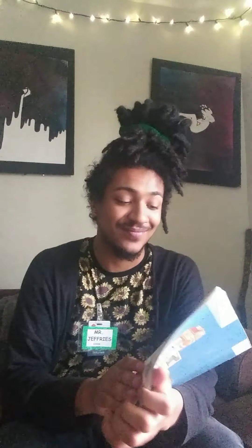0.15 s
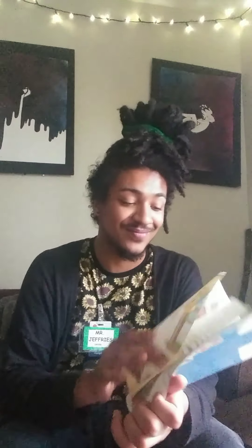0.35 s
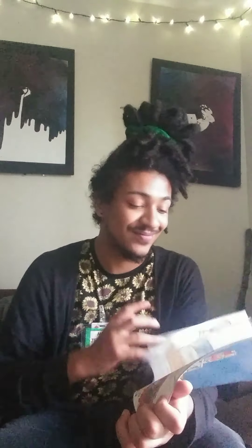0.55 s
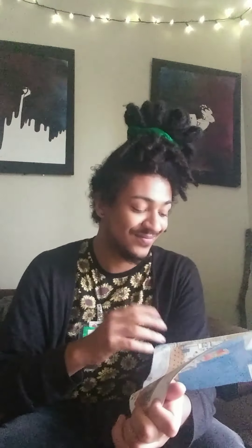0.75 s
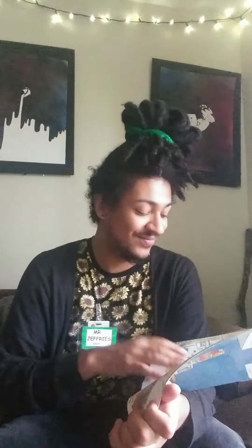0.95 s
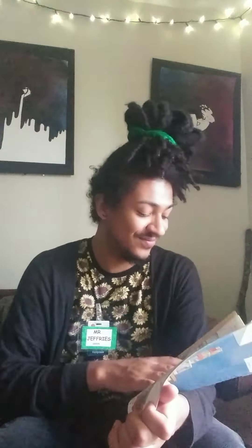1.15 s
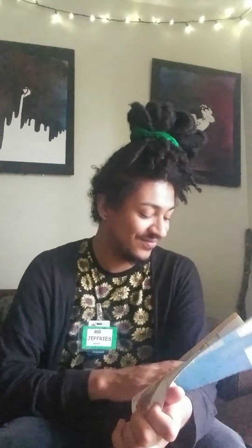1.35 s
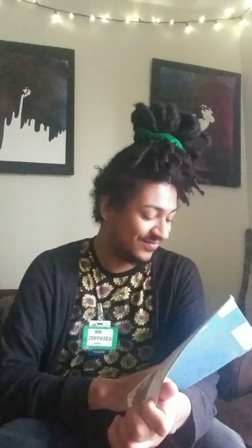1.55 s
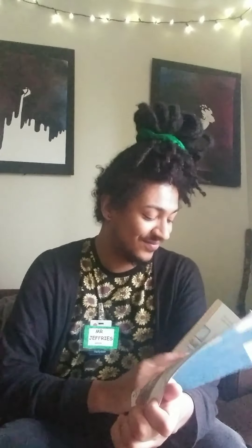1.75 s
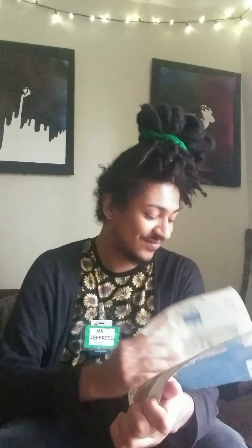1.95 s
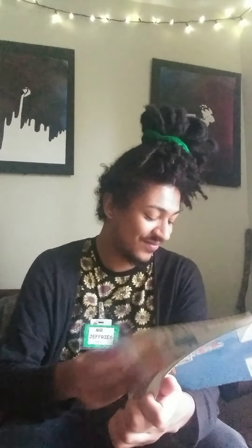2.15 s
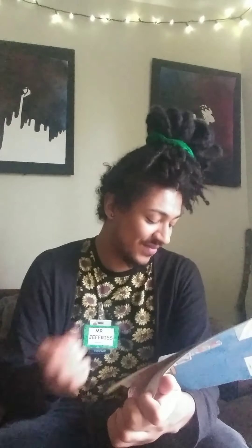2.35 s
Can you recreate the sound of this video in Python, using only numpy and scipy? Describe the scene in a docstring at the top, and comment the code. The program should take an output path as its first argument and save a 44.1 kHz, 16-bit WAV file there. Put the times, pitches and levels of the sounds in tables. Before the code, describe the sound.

Pages of a thin book are turned by hand, close by in a small, quiet room. One sheet slides, crackles and flutters over, a hand lightly brushes the paper, then a second sheet turns over a faint hum.

```python
"""In a small, quiet room, two pages of a thin book are turned by hand.
Each sheet hisses as it slides, snaps as it buckles and flutters as it falls over.
Between the turns a hand smooths the page and feels for the next corner.
There are faint squeaks, dry ticks and soft bumps of the book. The walls add short echoes,
and a low rumble and hum lie under it all."""
import sys
import numpy as np
from scipy import signal
from scipy.fft import rfft, irfft
from scipy.io import wavfile
from scipy.ndimage import uniform_filter1d

SR = 44100
rng = np.random.default_rng(int(sys.argv[2]) if len(sys.argv) > 2 else 0)


def to_wav(s):
    """Save 16-bit WAV."""
    ch = np.atleast_2d(s).T  # columns
    pcm = np.round(np.clip(ch, -1, 1) * 32767)  # PCM
    wavfile.write(sys.argv[1], SR, pcm.astype(np.int16))


N = 110250
HZ = np.fft.rfftfreq(4096, 1 / SR)  # the frequencies at which tone curves are drawn


def slides():
    """In each turn, one sheet drags over its neighbour and through the fingers."""
    # One table per turn. Each row: time in seconds, level in dB, brightness in dB per octave
    # (friction limits the brightness to between -4 and 4).
    first_turn = [(.12, -75, -7), (.168, -49, -1), (.194, -46.5, -0.5), (.255, -47.5, -1.5),
                  (.32, -42.5, 2), (.365, -38, 2), (.48, -38, 2.5), (.527, -36, 3), (.55, -42, 16),
                  (.58, -32.5, -3.5), (.605, -42, 19), (.64, -38, -2.5), (.668, -44, -2), (.724, -41, 0.5),
                  (.755, -60.5, -4), (.785, -58.5, -3.5), (.85, -78, 7)]
    second_turn = [(1.66, -67, 0), (1.695, -51, 0), (1.714, -39.5, -1), (1.76, -43.5, 0),
                   (1.79, -42.5, 0.5), (1.844, -38, 0), (1.872, -35.5, -0.5), (1.9, -48.5, -1),
                   (1.93, -51, -4.5), (1.968, -49, -1), (2.01, -61, -1.5), (2.06, -62, 1),
                   (2.085, -49, -1.5), (2.125, -45.5, -0.5), (2.158, -38, 2.5), (2.21, -43.5, 0),
                   (2.25, -54, 13), (2.3, -78, 3)]
    t = np.arange(N) / SR
    mix = np.zeros(N)
    for turn in (first_turn, second_turn):
        times, db, brightness = np.transpose(turn)
        loudness = amp(np.interp(t, times, db)) * (t > times[0]) * (t < times[-1])
        mix += loudness * friction(np.interp(t, times, brightness))
    return mix


def friction(brightness):
    """Paper fibres catch and slip thousands of times a second, which makes a grainy hiss."""
    # The tone of sliding paper. Each row: frequency in Hz, level in dB.
    hiss_tone = [(30, -31.5), (250, -1.5), (500, -5.5), (1000, -3.5), (1800, 0), (3200, 1.5), (5400, 3),
                 (10000, 0), (15500, -4)]
    grain = slips(per_s=5000, spread_db=-0.5) + amp(-3.5) * rng.standard_normal(N)
    flicker_db = 1.06 * unit(uniform_filter1d(rng.standard_normal(N), int(0.0047 * SR)))
    grain = unit(grain * amp(flicker_db))
    octaves = np.log2(np.maximum(HZ, 1000) / 5000)
    brightness = np.clip(brightness, -4, 4)
    hiss = np.zeros(N)
    for tilt in (-4, -2, 0, 2, 4):  # blend five versions, from dull to bright
        share = np.maximum(1 - abs(brightness - tilt) / 2, 0)
        hiss += share * colour(grain, read(hiss_tone) + tilt * octaves)[:N]
    return hiss


def snaps():
    """The sheet buckles with sharp cracks. Gives the direct sound and the sound sent to the walls."""
    # Each row: start in seconds, level in dB, ring pitch in Hz, ring boost in dB, treble boost in dB,
    # fade time in seconds, gain toward the walls in dB.
    buckles = [(.265, -37, 1052, 10, -10.5, 0.0041, -0.5), (0.334, -32, 1230, 13.5, -0.5, 0.0035, 2.5),
               (.343, -37, 2500, 21, -5, 0.0043, -16), (.419, -33.5, 1250, 16.5, -1, 0.0052, -5),
               (.507, -42, 850, 8, -18, 0.0028, 11), (.574, -34, 890, 13.5, -5, 0.0022, 3),
               (.582, -28, 3590, 2, -2, 0.0057, -7), (0.6276, -35, 6850, 10, 12, 0.002, -7),
               (.723, -32.5, 1760, 6, 7.5, 0.0042, -0.5), (1.051, -55, 457, 18, -12, 0.0032, 5),
               (1.1394, -43.5, 920, 5.5, -0.5, 0.0019, 6), (1.184, -51, 795, 18, -8, .002, -17),
               (1.6, -45.5, 1080, 0, -14.5, 0.0029, -1), (1.712, -42.5, 393, 16.5, -8, 0.0023, -24),
               (1.771, -37, 2860, 9, 4, 0.0024, 3.5), (1.857, -30, 550, 7.5, -0.5, 0.0026, -9),
               (1.866, -30, 2160, 3.5, 8, 0.0032, 2), (1.974, -32.5, 610, 3, -12, 0.002, -2),
               (1.982, -37.5, 1390, 4, 5, 0.0051, -4), (2.0636, -26, 5340, 4, 6, 0.0012, -1),
               (2.073, -30.5, 2770, 32, -13, 0.0066, -4.5), (2.325, -48.5, 2840, 7.5, -19.5, 0.0037, -3)]
    direct, to_walls = np.zeros((2, N))
    for start, db, *tone, decay_s, walls_db in buckles:
        snap = amp(db) * colour(crack(decay_s), sheet_tone(*tone))
        add(direct, start, snap)
        add(to_walls, start, amp(walls_db) * snap)
    return direct, to_walls


def flutters():
    """The loose sheet flaps and lands, each time with a run of soft buckles."""
    # Each row: start and length in seconds, level in dB, ring pitch in Hz, ring and treble boosts in dB.
    flaps = [(0.166, 0.38, -54.5, 1520, 16, 1), (0.424, 0.034, -46, 1290, 17, -23),
             (0.501, 0.11, -47, 795, 4, -18), (0.594, 0.07, -38, 800, 3, -10),
             (0.665, 0.089, -44.5, 1080, 2, -0.5), (2.199, 0.034, -36.5, 1400, 7, -6.5)]
    mix = np.zeros(N)
    for start, length, db, *tone in flaps:
        shape = swell(length, peak=0.32)
        clicks = slips(per_s=2500, spread_db=2)[:len(shape)]
        buckles = unit(flattened(clicks, size=9))
        add(mix, start, amp(db) * colour(shape * buckles, sheet_tone(*tone)))
    return mix


def sheet_tone(ring_hz, ring_db, treble_db):
    """A bent sheet has one broad ring, and treble that depends on how taut it is."""
    # The basic tone of buckling paper. Each row: frequency in Hz, level in dB.
    buckle_tone = [(30, -41), (220, -8), (450, -5.5), (1000, -1), (2100, -0.5), (2750, 0), (3900, 2),
                   (5200, -4.5), (8000, -10), (11000, -23), (15500, -33)]
    ring_octaves, treble_hz = 0.45, 2140
    ring = ring_db * np.exp(-.5 * (np.log2((HZ + 1) / ring_hz) / ring_octaves) ** 2)
    treble = treble_db * HZ ** 2 / (HZ ** 2 + treble_hz ** 2)
    return read(buckle_tone) + ring + treble


def taut_ring(fade_s=0.01):
    """The stretched sheet rings like a loose drumskin: a few clear tones, with the bass kept out."""
    # The tones of the stretched sheet. Each row: pitch in Hz, level in dB.
    modes = [(1020, -17.5), (1590, -20), (2740, -21.5)]
    t = np.arange(2048) / SR
    ring = sum(amp(db - 60 * t / fade_s) * np.cos(2 * np.pi * hz * t) for hz, db in modes)
    return signal.lfilter(*signal.butter(2, 450, "high", fs=SR), ring)


def brushes():
    """The hand rubs the page in light strokes."""
    # Each row: start in seconds, length in seconds, level in dB, brightness in dB per octave.
    strokes = [(1.046, 0.085, -57, -0.5), (1.135, 0.049, -56.5, -1), (1.2, 0.065, -64, -4),
               (1.311, 0.08, -56.5, -0.8), (1.42, 0.072, -65, 4), (1.466, 0.14, -60.5, 0),
               (1.563, 0.1, -53.5, -1)]
    mix = np.zeros(N)
    for start, length, db, brightness in strokes:
        shape = swell(length, peak=0.15)
        add(mix, start, amp(db) * shape * friction(brightness)[:len(shape)])
    return mix


def squeaks(width=0.081):
    """Skin or paper sticks and slips: a fuzzy tone that glides as the free length of paper changes."""
    # Each row: start in seconds, length in seconds, level in dB, first and last pitch in Hz.
    glides = [(.455, 0.048, -49.5, 5100, 3350), (1.056, .06, -66.5, 2390, 2690),
              (1.31, .035, -57, 3040, 2710), (1.332, .06, -63, 2563, 2564)]
    mix = np.zeros(N)
    for start, length, db, first_hz, last_hz in glides:
        shape = swell(length, peak=0.43)
        cycles = np.cumsum(np.linspace(first_hz, last_hz, len(shape))) / SR
        noise = rng.standard_normal(N) + 1j * rng.standard_normal(N)
        # Slow noise blurs the tone into a band; width is a share of the first pitch.
        waver = signal.lfilter(*signal.butter(1, width * first_hz / SR), noise)[-len(shape):]
        tone = (waver * np.exp(2j * np.pi * cycles)).real
        add(mix, start, amp(db) * shape * unit(tone))
    return mix


def bumps(room_hz=228.2, rise_s=0.0026, fade_s=0.25):
    """The book knocks softly in the hands, and the room rings briefly at one low pitch."""
    # Each row: start in seconds, level in dB.
    knocks = [(1.14, -48.5), (1.477, -62), (1.69, -48), (1.86, -51), (1.975, -49.5), (2.067, -53)]
    t = np.arange(16000) / SR
    shape = (1 - np.exp(-t / rise_s)) * amp(-60 * t / fade_s)
    mix = np.zeros(N)
    for start, db in knocks:
        add(mix, start, amp(db) * shape * np.sin(2 * np.pi * (room_hz * t + rng.random())))
    return mix


def ticks():
    """Small, dry ticks sound close by."""
    # Each row: start in seconds, level in dB.
    clicks = [(.638, -40), (.696, -43.5), (2.4867, -50), (2.4906, -47.5)]
    # Their thin, bright tone. Each row: frequency in Hz, level in dB.
    tick_tone = [(500, -23), (5000, -16), (7500, -5), (9500, 7), (12000, 1), (15500, -17)]
    mix = np.zeros(N)
    for start, db in clicks:
        add(mix, start, amp(db) * colour(crack(decay_s=.0006), read(tick_tone)))
    return mix


def room(x, patterns=5, drift_s=.022):
    """The echoes keep changing as the sheet moves: one echo pattern fades into the next."""
    place = np.arange(N) / SR / drift_s
    shares = [np.sin(np.pi / 2 * np.minimum((place - k) % patterns, 2)) for k in range(patterns)]
    return sum(signal.fftconvolve(x * share, walls())[:N] for share in shares)


def walls(size=24000, tail_delay_s=.008, tail_db=-5):
    """Near walls answer a click with scattered echoes and a short tail."""
    # The first echoes. Each row: delay in seconds, level in dB.
    echoes = [(.0052, -11.5), (.0083, -10.5), (0.0103, -8), (0.014, -14.5), (.0198, -22)]
    # How long the tail lasts. Each row: frequency in Hz, seconds to fade by 60 dB.
    fade_times = [(150, 0.33), (1000, 0.19), (4000, 0.3), (8000, 0.27), (15000, 0.18)]
    hz, t, bands = signal.stft(rng.standard_normal(size), SR, nperseg=256)
    fade = amp(-60 * t / read(fade_times, hz)[:, None])
    tail = signal.istft(bands * fade, SR)[1]
    response = np.zeros(size)
    add(response, tail_delay_s, amp(tail_db) * tail / np.linalg.norm(tail))
    for delay, db in echoes:
        echo = crack(decay_s=0.00069)
        add(response, delay, amp(db) * echo / np.linalg.norm(echo))
    return response


def air(rumble_db=-63.5, hum_db=-67.5, hum_hz=225.7, hum_spread_hz=10.6):
    """The room rumbles steadily, with a wavering low hum."""
    # The tone of the rumble. Each row: frequency in Hz, level in dB.
    rumble_tone = [(25, -25), (100, -5.5), (160, 0), (195, -0.5), (228, 5.5), (300, 4), (400, -5),
                   (600, -7.5), (830, -2), (1300, -13.5), (2500, -17.5), (5000, -19.5), (8000, -24),
                   (15500, -18.5)]
    hz = np.fft.rfftfreq(N, 1 / SR)
    noise = flattened(rng.standard_normal(N), size=15)
    rumble = irfft(rfft(noise) * amp(read(rumble_tone, hz)), N)
    hum_band = 1 / (1 + ((hz - hum_hz) / hum_spread_hz) ** 2)
    hum = irfft(hum_band * np.exp(2j * np.pi * rng.random(len(hz))), N)
    return amp(rumble_db) * unit(rumble) + amp(hum_db) * unit(hum)


def slips(per_s, spread_db):
    """A random train of tiny clicks of uneven size."""
    size = amp(spread_db * np.minimum(rng.exponential(1, N), 4))
    return unit(size * rng.choice([-1., 1.], N) * (rng.random(N) < per_s / SR))


def crack(decay_s, size=2048):
    """A short burst of breaking contacts; long ones start softly."""
    t = np.arange(size) / SR
    shape = (1 - np.exp(-t / (0.61 * decay_s))) * np.exp(-t / decay_s)
    burst = flattened(rng.choice([-1., 1.], size) * shape, size=15)
    burst *= np.minimum(8 * (1 - t / t[-1]) ** 2, 1)  # fade the end to silence
    return burst / np.linalg.norm(burst) * np.sqrt(SR / 200)  # the energy of 5 ms at full level


def swell(length, peak):
    """A rounded rise and fall; peak says where its top lies, as a share of the length."""
    progress = np.linspace(0, 1, int(length * SR))
    return np.sin(np.interp(progress, [0, peak, 1], [0, np.pi / 2, np.pi]))


def flattened(x, size):
    """Evens out the chance peaks and holes in the tone of a noise."""
    spectrum = rfft(x)
    power = uniform_filter1d(abs(spectrum) ** 2, size=size)
    return irfft(spectrum / np.sqrt(power + 1e-9), len(x))


def colour(x, db):
    """Gives a sound a tone curve and keeps its energy."""
    y = signal.fftconvolve(x, tone_filter(db))
    return y * np.linalg.norm(x) / (np.linalg.norm(y) + 1e-20)


def tone_filter(db):
    """The quickest filter that has this tone curve."""
    log_gain = np.log(amp(np.r_[db, db[-2:0:-1]]))
    return np.fft.ifft(np.exp(np.conj(signal.hilbert(log_gain)))).real


def read(points, hz=HZ):
    """Joins the rows of a table into a curve over a pitch scale."""
    f, value = np.transpose(points)
    return np.interp(np.log(hz + 1), np.log(f + 1), value)


def amp(db):
    """Turns decibels into a gain."""
    return 10 ** (np.asarray(db) / 20)


def unit(x):
    """Scales a sound to an average power of one."""
    return x / np.sqrt(np.mean(x ** 2) + 1e-20)


def add(mix, start, sound):
    """Lays a sound into the mix at a start time in seconds."""
    part = mix[max(round(start * SR), 0):][:len(sound)]
    part += sound[:len(part)]


def scene():
    """All the paper sounds in the room, heard in mono."""
    background = air()
    paper = slides() + brushes() + flutters() + squeaks() + bumps()
    add(paper, 2.0645, taut_ring())  # the sheet pulls taut at the top of the second turn
    snaps_direct, snaps_to_walls = snaps()
    direct = paper + snaps_direct + ticks()
    mono = amp(-2) * (direct + room(paper + snaps_to_walls)) + background
    return np.array([mono, mono])


def record(dry, top_hz=15580):
    """The microphone's opening puts dips and peaks in the treble; the highest treble is then cut."""
    # The tone of the microphone. Each row: frequency in Hz, gain in dB.
    mic_tone = [(1000, 1.5), (4900, 1.5), (5550, 4.5), (6250, -9.5), (6800, -4), (7400, 4), (7950, 11),
                (8700, 4.5), (10500, 1.5), (13000, -1.5), (15500, -6.5)]
    coloured = signal.oaconvolve(dry, tone_filter(read(mic_tone))[None])[:, :N]
    low_pass = signal.firwin(611, top_hz, window=("kaiser", 8), fs=SR)
    return signal.oaconvolve(coloured, low_pass[None], "same")


dry = scene()
out = record(dry)
to_wav(out)
```